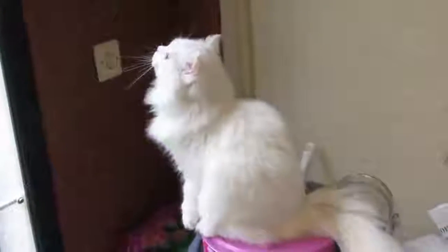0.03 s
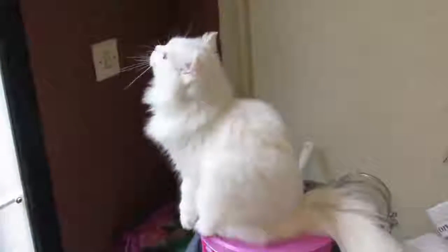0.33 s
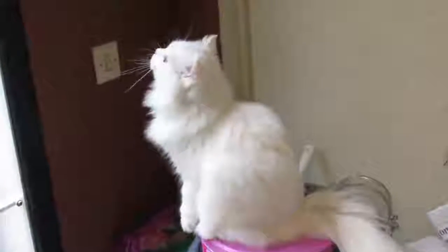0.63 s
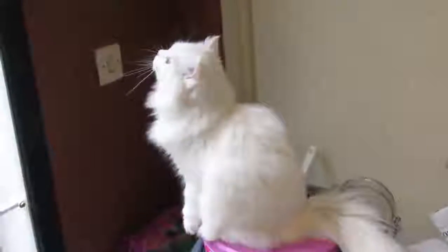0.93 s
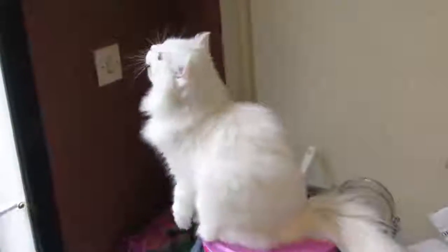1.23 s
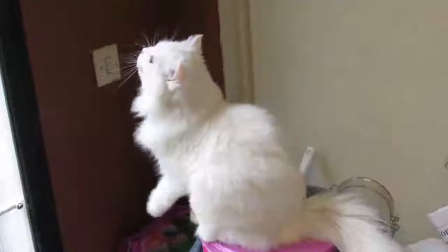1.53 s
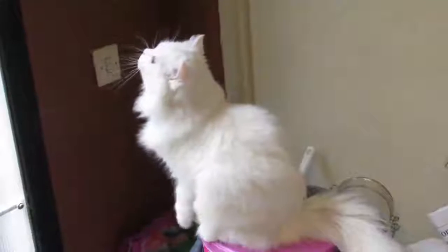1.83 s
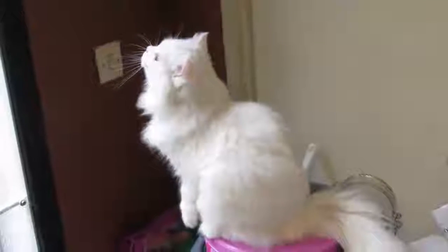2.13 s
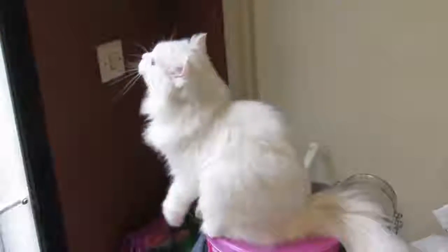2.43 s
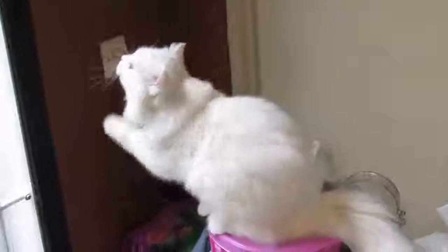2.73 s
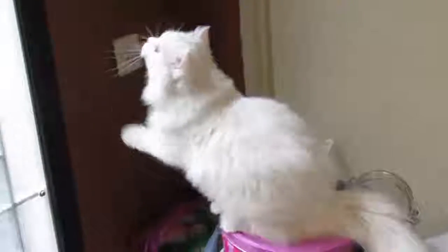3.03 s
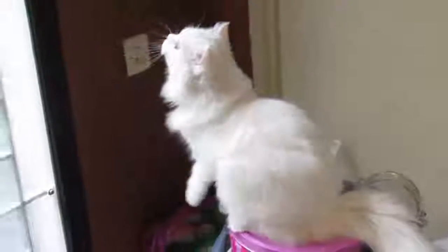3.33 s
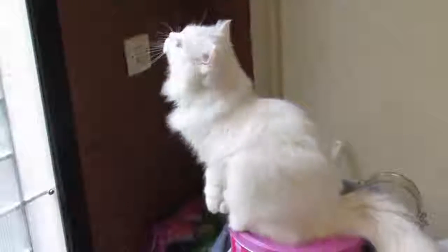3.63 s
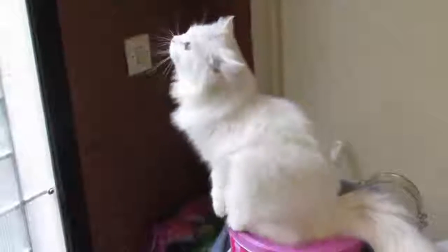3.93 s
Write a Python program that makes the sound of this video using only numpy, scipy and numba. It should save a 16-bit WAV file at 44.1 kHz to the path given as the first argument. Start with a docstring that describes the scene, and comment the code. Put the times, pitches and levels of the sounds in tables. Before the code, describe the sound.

Two breathy cat chirps with wet mouth clicks, over faint indoor rumble.

```python
"""Cat chirping in a small room

Two breathy, barely voiced chirps sound between hard walls, over a steady low rumble. The mouth opens
with a wet click; fluttering air and a thin, unsteady voice ring the throat near 2.2 kHz, and a brief
low note ends each call. Between the calls comes a faint whistle, probably air in the nose.
Dull swells of low noise come and go, the last as the cat rears."""
import sys
import numpy as np
from scipy import signal
from scipy.fft import rfft, irfft
from scipy.io import wavfile
from numba import njit

SR = 44100
rng = np.random.default_rng(int(sys.argv[2]) if len(sys.argv) > 2 else 0)


def master_out(mix):
    """Clip the mix to full scale and print it as 16-bit PCM to the path in sys.argv[1]."""
    frames = np.transpose(np.atleast_2d(mix))
    ceiling = np.clip(frames, -1, 1)
    pcm = np.round(ceiling * 32767).astype(np.int16)
    wavfile.write(sys.argv[1], SR, pcm)


N = 176400
T = np.arange(N) / SR


def undb(db):
    """Decibels to gain."""
    return 10 ** (np.asarray(db) / 20)


def unit(x):
    """Scale to rms 1."""
    return x / np.sqrt(np.mean(x ** 2))


def per_bin(points, size):
    """Interpolate (f/Hz, value) points at each FFT bin, over log frequency."""
    hz, value = np.transpose(points)
    return np.interp(np.log(np.fft.rfftfreq(size, 1 / SR) + 1e-3), np.log(hz), value)


def colour(x, points):
    """Filter by (f/Hz, gain/dB) points."""
    size = x.shape[-1]
    return irfft(rfft(x) * undb(per_bin(points, size)), size)


def envelope(times, db):
    """Gain along a level curve, silent outside it."""
    return undb(np.interp(T, times, db, left=-200, right=-200))


def swell(centre_s, length_s, db):
    """Gaussian gain curve peaking at db."""
    return undb(db) * np.exp(-(2 * (T - centre_s) / length_s) ** 2)


def wander(rate_hz):
    """Smooth random motion, rms 1."""
    return unit(signal.resample(rng.standard_normal(int(rate_hz * N / SR) + 2), N))


def flutter(rate_hz, depth_db):
    """Randomly wavering gain, rms 1."""
    return unit(undb(depth_db * wander(rate_hz)))


def stereo_noise(correlation, size):
    """Noise pair following (f/Hz, left-right correlation) points."""
    c = per_bin(correlation, size)
    mid, side = rfft(rng.standard_normal((2, size))) * np.sqrt([(1 + c) / 2, (1 - c) / 2])
    return irfft(np.array([mid + side, mid - side]), size)


@njit
def bandpass(x, hz, width_hz):
    """State-variable band-pass with a moving centre."""
    y = np.empty(len(x))
    band_state, low_state = 0., 0.
    for i in range(len(x)):
        g = np.tan(np.pi * hz[i] / SR)
        damping = width_hz / hz[i]
        band = (band_state + g * (x[i] - low_state)) / (1 + g * (g + damping))
        band_state = 2 * band - band_state
        low_state += 2 * g * band
        y[i] = damping * band
    return y


def noise_band(hz, width_hz):
    """Noise through two equal band-passes, rms 1."""
    centre_hz = hz * np.ones(N)
    once = bandpass(rng.standard_normal(N), centre_hz, float(width_hz))
    return unit(bandpass(once, centre_hz, float(width_hz)))


# Reflections: f/Hz, left-right correlation
ROOM_CORRELATION = [(500, 0.64), (2300, 0.95), (4300, 0.92), (8000, .5), (14000, .1)]


def room(x, wet_db=0, early_decay_s=0.0094, low_t60_s=0.86, treble_t60_s=1):
    """Direct sound, near-corner reflections and a tail whose treble lasts slightly longer."""
    t = T[:SR]
    early = stereo_noise(ROOM_CORRELATION, SR) * np.exp(-t / early_decay_s) * (t > .002)
    tail = stereo_noise(ROOM_CORRELATION, SR) * np.minimum(t / 0.024, 1)
    low = colour(tail, [(2500, -5), (7000, -20)])
    late = low * undb(-60 * t / low_t60_s) + (tail - low) * undb(-60 * t / treble_t60_s)
    response = undb(wet_db) * (undb(-1.5) * unit(early) + undb(-3.5) * unit(late)) / np.sqrt(SR)
    response[:, 0] += 1  # direct path
    return signal.fftconvolve(x[None], unit(response) / np.sqrt(SR), axes=1)[:, :N]


# Ambient noise: f/Hz, left-right correlation
AMBIENT_CORRELATION = [(45, -0.21), (75, -0.28), (150, 0.56), (300, 0.37), (630, 0.18), (1400, 0.28),
                       (3000, 0.64), (6700, 0.12), (14000, 0.027)]
# Microphone hiss spectrum: f/Hz, gain/dB
MIC_SPECTRUM = [(1000, -4), (2500, 3), (4500, 0), (9000, 0.5), (14000, -3)]


def mic_hiss(level_db=-63.5):
    """Faint, even hiss of the microphone."""
    return undb(level_db) * unit(colour(stereo_noise(AMBIENT_CORRELATION, N), MIC_SPECTRUM))


# Room hum: f/Hz, level/dB
HUM_TONES = [(100, -58.5), (203, -52), (556, -62)]


def hum(width_hz=20.5):
    """Faint, blurred tones, independent left and right."""
    return sum(undb(db) * np.array([noise_band(hz, width_hz) for _ in range(2)]) for hz, db in HUM_TONES)


# Rumble spectrum: f/Hz, gain/dB
RUMBLE_SPECTRUM = [(15, -40), (28, -17), (38, -9.5), (47, 2), (60, -10.5), (78, -5.5), (98, -6), (160, -4),
                   (205, -2.5), (255, -1), (300, -3), (400, -10.5), (500, -12.5), (570, -14), (630, -25.5),
                   (690, -28.5), (850, -20), (1100, -23.5), (1500, -24), (2000, -32.5), (3000, -44.5),
                   (4500, -55), (14000, -72)]
# Rumble envelope: t/s, level/dB
RUMBLE_ENVELOPE = [(0, -43.5), (.9, -40.5), (1.4, -41.5), (1.75, -43.5), (2.1, -42.5), (2.4, -43.5),
                   (3.1, -41.5), (3.6, -43.5), (4, -43)]
# Boom envelope: t/s, level/dB
BOOM_ENVELOPE = [(0, -46), (.3, -56), (1.0, -59.5), (1.25, -51), (1.8, -54.5), (2.07, -49), (2.14, -44.5),
                 (2.3, -43), (2.4, -46), (2.53, -45.5), (2.65, -59), (3.8, -54), (3.95, -47)]
# Balance of both: f/Hz, right over left/dB
RUMBLE_BALANCE = [(40, 4.5), (70, 4), (650, 3), (1200, -0.5), (14000, 1.5)]


def rumble(drift_db=0.47):
    """Steady room rumble and a deep boom that swells now and then, both stronger on the right."""
    steady = unit(colour(stereo_noise(AMBIENT_CORRELATION, N), RUMBLE_SPECTRUM))
    steady *= undb(np.interp(T, *np.transpose(RUMBLE_ENVELOPE)) + drift_db * wander(rate_hz=5.8))
    boom = np.array([noise_band(hz=48.7, width_hz=7.6) for _ in range(2)])
    boom *= undb(np.interp(T, *np.transpose(BOOM_ENVELOPE)))
    lean_db = per_bin(RUMBLE_BALANCE, N) / 2
    return irfft(rfft(steady + boom) * undb([-lean_db, lean_db]), N)


# Low swells: centre t/s, length/s, level/dB
RUSTLE_SWELLS = [(.1, 0.48, -47), (.85, 0.55, -50), (1.41, .2, -56), (2.923, 0.47, -45)]
# Their spectrum: f/Hz, gain/dB
RUSTLE_SPECTRUM = [(150, -25), (250, -5), (310, 0), (370, 1), (480, -3), (650, -24), (950, -13.5),
                   (1500, -28), (3000, -56), (8000, -53)]


def rustle():
    """Dull swells of low noise, the last as the cat rears and settles."""
    gain = sum(swell(*row) for row in RUSTLE_SWELLS)
    return gain * unit(colour(stereo_noise(AMBIENT_CORRELATION, N), RUSTLE_SPECTRUM))


# Whistle airflow: t/s, level/dB
WHISTLE_ENVELOPE = [(1.78, -77), (1.795, -60.5), (1.86, -62), (1.9, -70), (1.95, -63.5), (2.0, -68),
                    (2.05, -71), (2.11, -75), (2.13, -91)]
# Whistle resonances: f/Hz, width/Hz, gain/dB
WHISTLE_BANDS = [(4870, 480, -1.5), (12400, 700, -11), (6250, 4900, -5)]


def whistle():
    """Thin, unsteady whistle, probably air through the nose."""
    flow = envelope(*np.transpose(WHISTLE_ENVELOPE)) * flutter(rate_hz=60.3, depth_db=2)
    return flow * sum(undb(db) * noise_band(hz, width_hz) for hz, width_hz, db in WHISTLE_BANDS)


# Mouth clicks: t/s, level/dB, decay/s, tilt/(dB per octave)
MOUTH_CLICKS = [(1.1218, -33, 0.0011, 2), (1.124, -45.5, 0.0084, 0), (1.14, -56.5, 0.061, -3),
                (1.592, -47, 0.0044, -9), (1.7855, -52.5, 0.015, -13), (2.469, -49, 0.012, -6),
                (2.763, -47, .008, -2), (2.962, -61, .012, -1)]
# Click spectrum before tilt: f/Hz, gain/dB
CLICK_SPECTRUM = [(900, -21), (2200, -6), (2900, 5), (4800, -9.5), (7100, 0.5), (8300, 1.5), (10500, -2),
                  (12000, -12), (13500, 2), (16000, -21)]


def mouth_clicks():
    """Wet lips and tongue part in short bursts of noise."""
    clicks = np.zeros(N)
    for start_s, db, decay_s, tilt in MOUTH_CLICKS:
        spectrum = [(hz, gain_db + tilt * np.log2(hz / 5000)) for hz, gain_db in CLICK_SPECTRUM]
        gain = undb(db) * (T >= start_s) * np.exp(-np.abs(T - start_s) / decay_s)
        clicks += gain * unit(colour(rng.standard_normal(N), spectrum))
    return clicks


# Closing notes: centre t/s, length/s, f/Hz, level/dB
CLOSING_NOTES = [(1.478, 0.041, 856, -47), (2.77, 0.031, 850, -52.5)]


def closing_notes(width_hz=69):
    """A short, soft low note as the throat closes on each call."""
    return sum(swell(centre_s, length_s, db) * noise_band(hz, width_hz)
               for centre_s, length_s, hz, db in CLOSING_NOTES)


# Throat response to the voice: f/Hz, gain/dB
VOICE_SPECTRUM = [(600, -27), (900, -21), (1310, -18.5), (1650, -12.5), (2050, -4.5), (2280, 3.5),
                  (2700, -13), (3050, -13.5), (3450, -16), (3900, -22), (4400, -22.5), (4750, -23.5),
                  (6000, -29)]


def voice(pitch_hz, jitter=0.0221, waver=.016):
    """Loosely vibrating vocal folds: eight harmonics shaped by the throat."""
    unsteady_hz = pitch_hz * (1 + jitter * wander(rate_hz=500.4) + waver * wander(rate_hz=59.96))
    phase = 2 * np.pi * np.cumsum(unsteady_hz) / SR
    hz, db = np.transpose(VOICE_SPECTRUM)
    return np.sqrt(2) * sum(undb(np.interp(k * pitch_hz, hz, db)) * np.sin(k * phase) for k in range(1, 9))


# Contours per chirp: t/s, air/dB, voice/dB, pitch/Hz, main throat resonance/Hz, teeth hiss/dB
CHIRP_CONTOURS = [
    [(1.205, -61, -70, 620, 2230, -53), (1.213, -45.5, -59, 622.6, 2230, -57),
     (1.24, -40, -53, 622, 2150, -59), (1.265, -37.5, -40, 648, 2140, -58),
     (1.305, -45, -46, 745, 2240, -60), (1.33, -40, -42.5, 752, 2210, -58),
     (1.37, -44, -44, 712, 2220, -61), (1.42, -45.5, -38.5, 757, 2300, -59),
     (1.474, -50, -44.5, 770, 2320, -59.5), (1.492, -63, -52, 770, 2320, -69)],
    [(2.482, -60, -70, 685.5, 2190, -66), (2.503, -45, -48, 735, 2200, -58.5),
     (2.545, -39, -45, 702, 2190, -57), (2.595, -47, -40, 672, 2200, -58),
     (2.635, -42, -51, 680, 2200, -53), (2.67, -42.5, -47, 708, 2160, -54.5),
     (2.72, -43.5, -48, 755, 2230, -55), (2.77, -46, -43, 678, 2170, -55),
     (2.815, -43, -45, 680, 2310, -56.5), (2.838, -49.5, -63, 686, 2090, -48.5),
     (2.855, -57, -69, 680, 2160, -58)],
]
# Main throat resonance per chirp: width/Hz
THROAT_WIDTHS_HZ = [420, 470]
# Side resonances of throat and mouth per chirp: f/Hz, width/Hz, gain/dB re main
SIDE_RESONANCES = [
    [(1263, 350, -11), (1880, 180, -10), (2780, 610, -14), (3820, 210, -18), (4500, 750, -25)],
    [(1260, 380, -9), (1650, 400, -23), (2740, 220, -13), (3400, 870, -11.5), (4700, 630, -23.5)],
]
# Hiss at the teeth: f/Hz, gain/dB
TEETH_SPECTRUM = [(700, 2), (1500, -25), (3000, -4.5), (4500, -1.5), (6500, 5), (8000, -0.5), (9700, -5),
                  (11000, -8), (15000, -38)]


def chirp(contour, main_width_hz, side_resonances):
    """Fluttering air rings the throat, barely sets the voice going and hisses past the teeth."""
    times, air_db, voice_db, pitch_hz, main_hz, hiss_db = np.transpose(contour)
    main = noise_band(np.interp(T, times, main_hz), main_width_hz)
    sides = sum(undb(db) * noise_band(hz, width_hz) for hz, width_hz, db in side_resonances)
    breath = envelope(times, air_db) * (main + sides)
    tone = envelope(times, voice_db) * voice(np.interp(T, times, pitch_hz))
    hiss = envelope(times, hiss_db) * unit(colour(rng.standard_normal(N), TEETH_SPECTRUM))
    return flutter(rate_hz=160.5, depth_db=2.5) * (breath + tone + hiss)


def scene():
    """The cat in its room over the background; the clicks are drier than the calls."""
    background = rumble() + hum() + mic_hiss() + rustle()
    calls = sum(chirp(*call) for call in zip(CHIRP_CONTOURS, THROAT_WIDTHS_HZ, SIDE_RESONANCES))
    return background + room(calls + closing_notes() + whistle()) + room(mouth_clicks(), wet_db=-4)


def record(dry):
    """Steep low-pass at 14.5 kHz."""
    return signal.sosfilt(signal.ellip(8, .2, 70, 14500, fs=SR, output="sos"), dry)


dry = scene()
out = record(dry)
master_out(out)
```